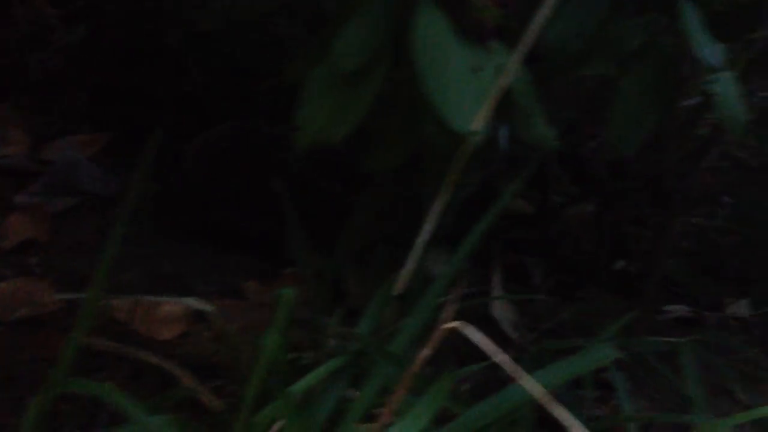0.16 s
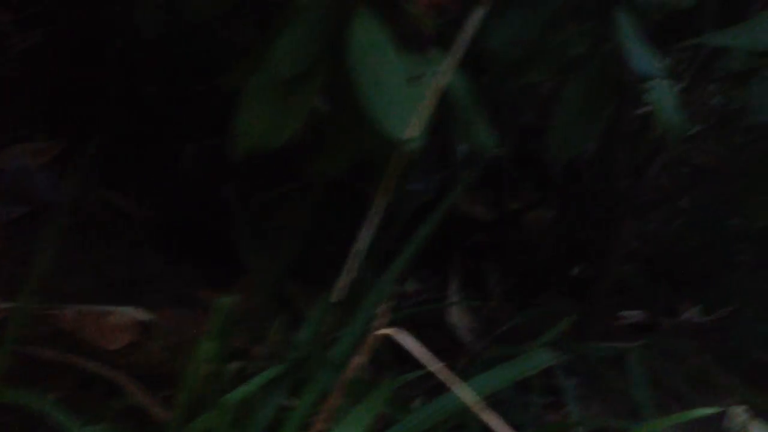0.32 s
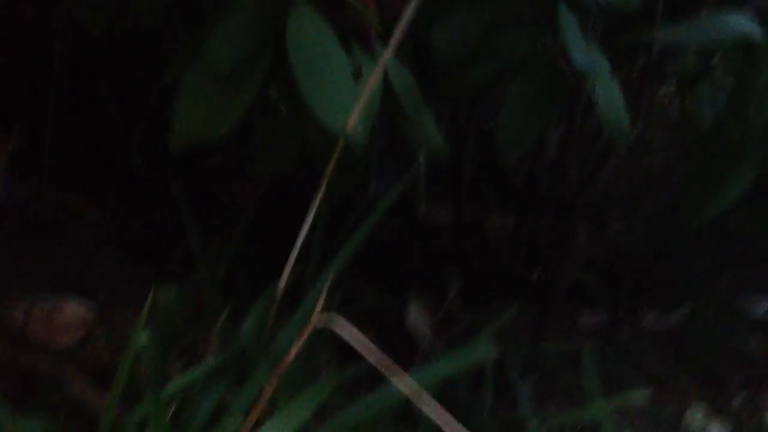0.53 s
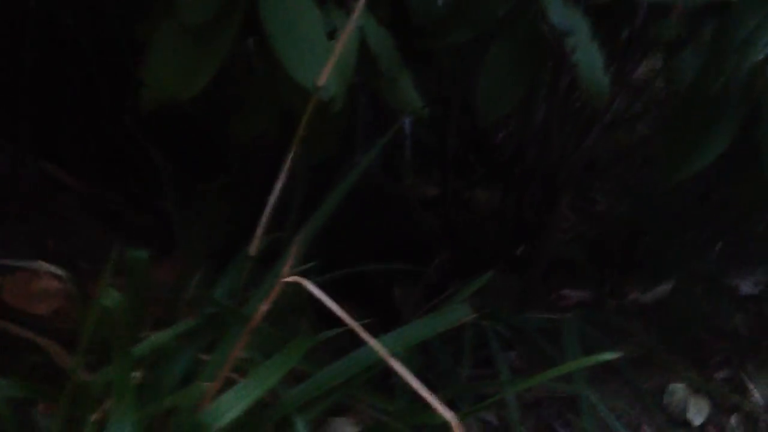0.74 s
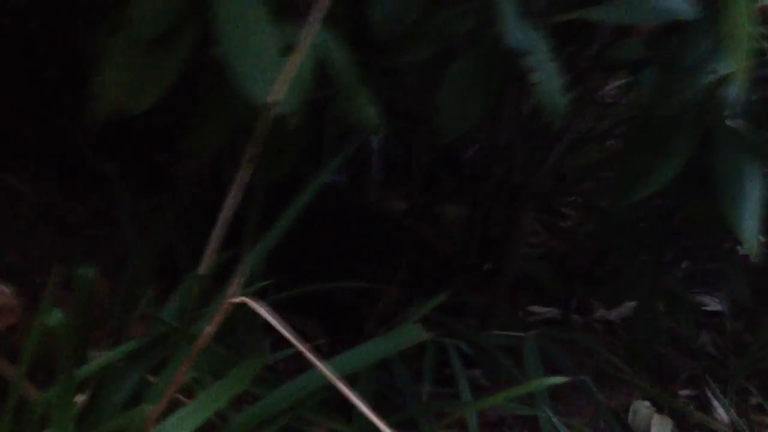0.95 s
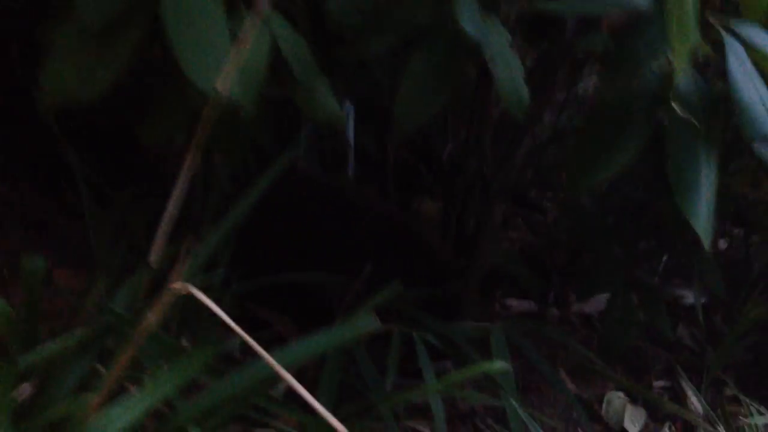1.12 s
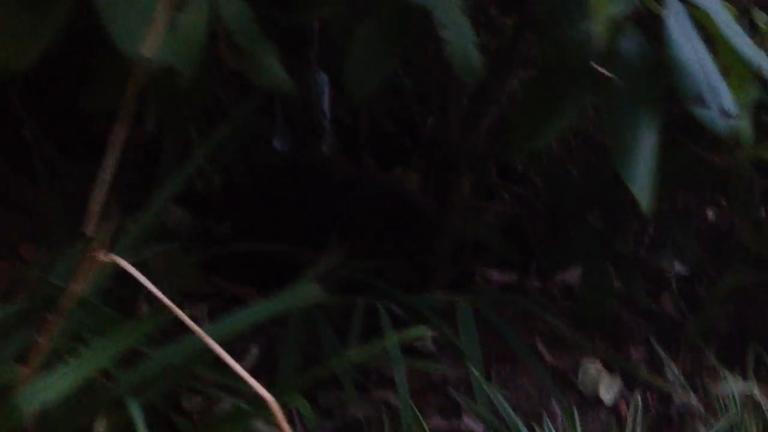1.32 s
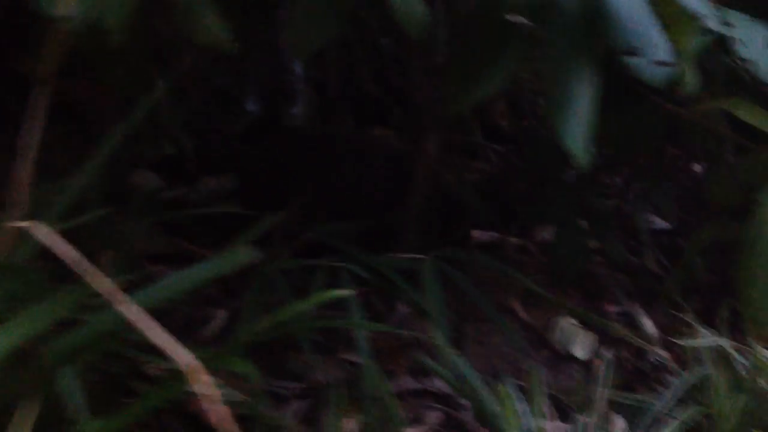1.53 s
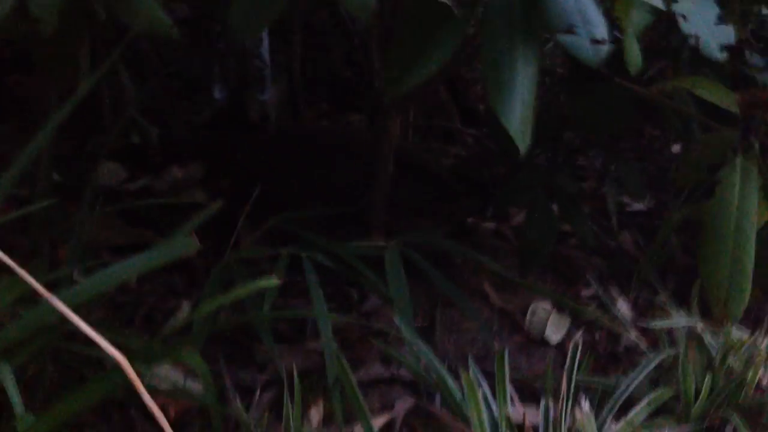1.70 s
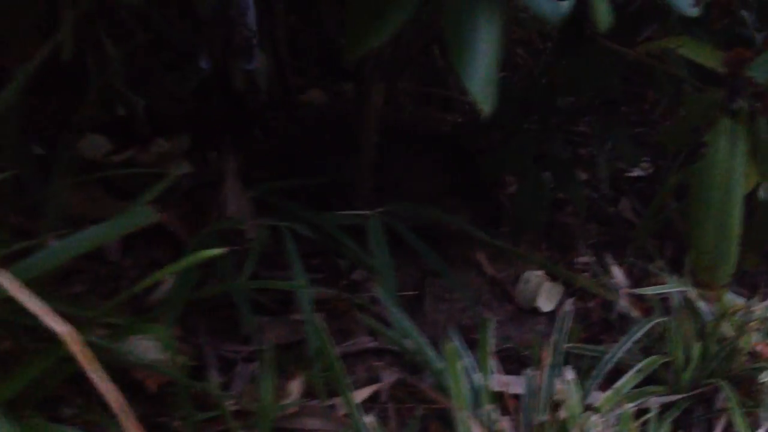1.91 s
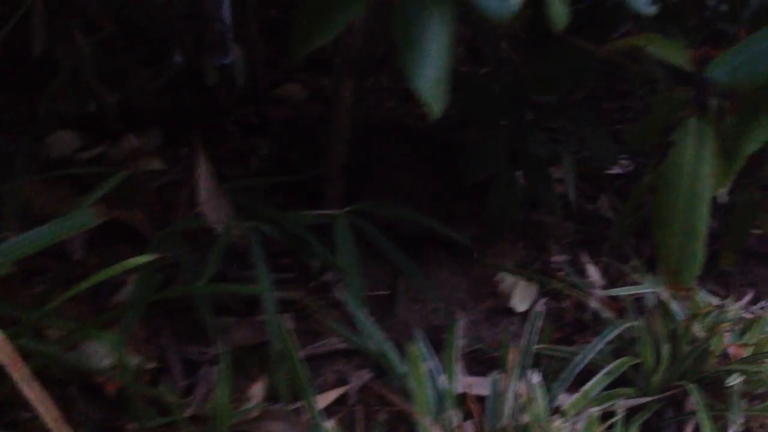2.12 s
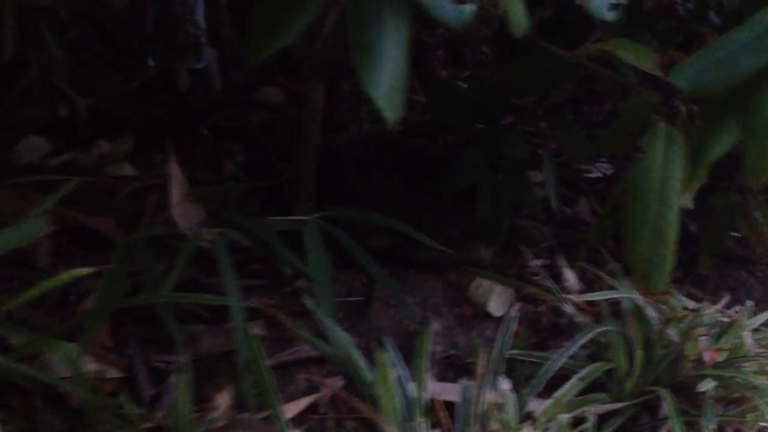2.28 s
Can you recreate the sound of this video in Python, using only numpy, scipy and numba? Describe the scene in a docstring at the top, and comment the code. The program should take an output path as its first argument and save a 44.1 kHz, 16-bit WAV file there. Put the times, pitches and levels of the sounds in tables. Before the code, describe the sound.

Dry leaves rustle and crinkle in swells, with sharp crackling snaps, close up in a garden bed

```python
"""Dry leaves drag and crinkle in swells as a small animal pushes through a garden bed at dusk,
close to a hand-held phone: swarms of short fading sines follow level tracks.
Snaps are showers of such grains behind a crack; scuffs are grains that swell and fade.
The animal squeaks softly (gliding sines); distant hum and hiss (filtered noise) lie under it all."""
import sys
import numpy as np
from scipy import signal
from scipy.fft import rfft, irfft
from scipy.io import wavfile
from numba import njit

SR = 44100
rng = np.random.default_rng(int(sys.argv[2]) if len(sys.argv) > 2 else 0)


def pcm_store(signal):
    """Save signal as 16-bit PCM."""
    levels = np.round(np.clip(np.atleast_2d(signal), -1, 1) * 32767)
    wavfile.write(sys.argv[1], SR, levels.astype(np.int16).T)


def to_linear_factor(level_db):
    """Convert decibel levels (scalar or array-like) to linear amplitude factors."""
    exponent = np.asarray(level_db, float) / 20
    return 10 ** exponent


N = 103635  # samples
DULL_HZ, DULL_OCTAVES = 1580, 0.75  # centre and pitch spread of dull grains


@njit
def ring(start, hz, t60_s, size):
    """Sums grains, each one sine decaying by 60 dB in t60_s."""
    out = np.zeros(N)
    for k in range(len(start)):
        turn = np.exp(2j * np.pi * hz[k] / SR - np.log(1000.) / (t60_s[k] * SR))
        z = size[k] + 0j
        for i in range(max(start[k], 0), min(N, start[k] + int(t60_s[k] * SR) + 2)):
            out[i] += z.imag
            z *= turn
    return out


def grains(at_s, level_db, centre_hz, octaves, cycles, scatter_db, draw):
    """Grains ring for a set number of cycles; pitch scatters, size has a long tail of loud ones."""
    hz = np.clip(centre_hz * 2 ** (octaves * draw[..., 0]), 300, 16500)
    tail_db = np.minimum(scatter_db * (draw[..., 1] ** 2 + draw[..., 2] ** 2 - 2) / 2, 8.0)
    size = to_linear_factor(level_db + tail_db) * np.sign(draw[..., 1])
    start = (at_s * SR).astype(np.int64)
    return ring(start.ravel(), hz.ravel(), (cycles / hz).ravel(), size.ravel())


def colour(x, points):
    """Zero-phase filter through (hz, gain_db) points, straight on a log-frequency axis."""
    f = np.arange(N // 2 + 1) * SR / N + 1
    hz, gain_db = np.array(points).T
    return irfft(rfft(x) * to_linear_factor(np.interp(np.log(f), np.log(hz), gain_db)), N)


def flutter(at_s, rate_hz):
    """Random level: normal draws of unit spread at rate_hz, joined by straight lines."""
    steps = rng.standard_normal(size=400)
    return np.interp(at_s * rate_hz, np.arange(len(steps)), steps)


def rustle(count=9000):
    """Dragged leaves: three grain swarms share a slow and a quick flutter; each adds its own."""
    # time_s, hollow_db (crinkle near 4.5 kHz), crisp_db (treble), dull_db (shuffle); before trims
    drag = np.array([(0.0, -73, -88, -70), (0.23, -63, -50.5, -59.5), (0.37, -57, -56, -59),
                     (0.56, -50.5, -50.5, -58), (0.67, -49.5, -56, -60.5), (0.9, -49, -53, -53.5),
                     (0.955, -55.5, -64, -59), (1.12, -61.5, -55.5, -62.5), (1.34, -51.5, -55, -62),
                     (1.48, -52.5, -54.5, -59), (1.6, -67, -63, -58.5), (1.82, -100, -64, -70.5),
                     (2.05, -55.5, -50, -58), (2.21, -74, -59, -64), (2.35, -85, -83, -66)]).T
    at_s = rng.random((3, count)) * N / SR
    shared_db = flutter(at_s, 44.57) * 1.16 + flutter(at_s, 150) * 3.6
    level_db = []
    for k, share in enumerate((1, 1, .5)):
        track_db = np.interp(at_s[k], drag[0], drag[k + 1])
        level_db.append(track_db + share * shared_db[k] + 2.6 * flutter(at_s[k], 120))
    draw = rng.standard_normal((3, count, 3))
    hollow = grains(at_s[0], level_db[0] - 4.0, 4440, 0.13, 19.7, 1.6, draw[0])
    crisp = grains(at_s[1], level_db[1], 8000, 0.61, 11.6, 1.0, draw[1])
    dull = grains(at_s[2], level_db[2] - 3.0, DULL_HZ, DULL_OCTAVES, 6.1, 1.4, draw[2])
    return np.array([hollow + crisp, dull])


def air():
    """Steady distant hiss and a low hum of slowly changing level, both shaped from white noise."""
    # hiss spectrum: hz, relative_db (per Hz)
    hiss_points = [(40, -39), (101, -5), (151, -6), (454, -6), (528, -12), (1040, -13), (1370, -22.5),
                   (2980, -17), (4500, -15), (8000, -15.5), (10200, -24), (14400, -22)]
    # hum level: time_s, level_db (before a 4 dB cut)
    hum_track = np.array([(0.0, -63.5), (0.69, -61), (0.9, -63.5), (1.61, -60.5), (1.81, -65),
                          (2.35, -54.5)]).T
    hum_hz, hum_octaves, hiss_rms_db = 151.4, 0.57, -61
    hiss = colour(rng.standard_normal(N), hiss_points)
    f = np.arange(N // 2 + 1) * SR / N + 1
    band = np.exp(-(np.log2(f / hum_hz) / hum_octaves) ** 2 / 2)
    hum = irfft(rfft(rng.standard_normal(N)) * band, N)
    swell = to_linear_factor(np.interp(np.arange(N) / SR, *hum_track) - 4.0)
    return hiss / hiss.std() * to_linear_factor(hiss_rms_db) + hum / hum.std() * swell


def bursts(at_s, level_db, leaf_hz, dull_db, tilt_db, draw):
    """Grain bursts: 1/3 near the leaf's pitch, 1/2 spread wide (more if bright), 1/6 dull."""
    kind = np.arange(at_s.shape[1]) % 6
    own, wide, low = kind < 2, (kind > 1) & (kind < 5), kind == 5
    leaf_hz = leaf_hz + 0 * at_s  # one pitch per grain
    pitch = draw[..., 0]
    bright_db = 2.4 * np.log2(leaf_hz / 6000)
    slope_db = tilt_db * np.clip(pitch, -.3, 1.5) + 2.6 * np.minimum(pitch + 0.99, 0)
    wide_db = level_db + 3.0 + bright_db + slope_db
    low_db = level_db + dull_db + 5.5
    leaf = grains(at_s[:, own], level_db[:, own] - 2.5, leaf_hz[:, own], 0.053, 33.3, 0.62, draw[:, own])
    spread = grains(at_s[:, wide], wide_db[:, wide], 7930, 0.58, 9.9, 1.3, draw[:, wide])
    dull = grains(at_s[:, low], low_db[:, low], DULL_HZ, DULL_OCTAVES, 5.44, 1.7, draw[:, low])
    return np.array([leaf + spread, dull])


def snaps(count=120):
    """Sudden snaps: a sharp crack, then a shower of grains that thins and fades."""
    # start_s (before the lag), level_db (nominal), centre_hz, t60_s,
    # dull_db (relative), tilt_db (towards the top treble)
    snap_rows = np.array([(.0034, -45, 6840, 0.069, -4.5, -5.5), (0.1612, -46.5, 6240, 0.049, -8.5, -20),
                          (0.2073, -43.5, 6800, .09, -7, -5), (0.4269, -46, 3700, 0.025, -6, 0),
                          (0.4618, -39, 8500, 0.06, -5.5, -17), (0.699, -42, 4500, 0.023, -13, -10),
                          (0.743, -44, 8950, 0.034, -29, 1), (1.0181, -46, 8340, 0.026, -8, -4),
                          (1.152, -38.5, 8800, 0.0096, -33, 5), (1.1568, -38, 8300, 0.04, -24, -8),
                          (1.2859, -28.5, 7000, 0.028, -41, 6.5), (1.2984, -47, 3980, 0.024, -25, 11),
                          (1.3086, -42, 7260, 0.035, -24, 7), (1.3462, -32.5, 7850, 0.013, -37, 6),
                          (1.353, -27, 8900, 0.016, -37, -2), (1.3574, -29.5, 4600, 0.035, -30, 7.5),
                          (1.6159, -37, 5970, 0.027, -19, -5), (1.638, -43, 6250, 0.011, -20, 0.5),
                          (1.6955, -47.5, 6260, 0.041, -33, -1), (1.7243, -62, 4660, 0.039, 7, -3),
                          (1.7354, -40.5, 6600, 0.024, -12, 1.5), (1.7454, -45, 8150, 0.033, -32, 4.5),
                          (1.86, -35.5, 7800, .04, -17, 2), (1.9988, -52.5, 7190, 0.03, -2.5, -1),
                          (2.0804, -43, 7760, 0.049, -20, 4)])
    lag_s = .0008
    start_s, level_db, hz, t60_s, dull_db, tilt_db = snap_rows.T[:, :, None]
    draw = rng.standard_normal((len(start_s), count, 3))
    late = np.linspace(0, 1, count) ** 1.6 * 0.58  # in t60s
    late_s = late * np.abs(t60_s)
    crack_db = 3 * np.exp(-late_s / .0005)
    dense_db = 10 * np.log10(np.abs(t60_s) / 0.04)  # evens out grain density
    grain_db = level_db + dense_db - 60 * late + crack_db
    return bursts(start_s + lag_s + late_s, grain_db, hz, dull_db, tilt_db, draw)


def scuffs(count=360):
    """Grains under a tent-shaped dB level that stutters; the leaf's pitch wanders as it bends."""
    # top_s, level_db (nominal), centre_hz, rise_s, fall_s, dull_db (relative)
    scuff_rows = np.array([(0.315, -48.5, 3880, 0.004, 0.069, -14), (0.391, -48.5, 3870, 0.002, 0.03, -33),
                           (0.479, -41.5, 4230, 0.0078, 0.094, -11), (0.54, -43, 6500, 0.031, 0.011, -17),
                           (0.589, -45.5, 4130, 0.023, 0.032, -28), (.73, -41, 4950, 0.053, 0.06, -15),
                           (0.779, -39, 4400, 0.061, 0.045, -12.5), (0.879, -52, 4500, 0.031, 0.091, -28),
                           (0.971, -44.5, 5160, 0.0019, 0.092, -18),
                           (1.164, -45.5, 6800, 0.006, 0.045, -13),
                           (1.192, -40.5, 4800, 0.0092, 0.049, -14.5),
                           (1.228, -39, 4820, 0.015, 0.043, -16.5), (1.33, -41, 5160, 0.012, 0.029, -20),
                           (1.565, -36.5, 7200, 0.014, 0.022, -24), (1.601, -41.5, 5800, 0.035, 0.039, -24),
                           (1.657, -35, 6700, 0.04, 0.03, -17.5), (1.827, -46.5, 7200, 0.012, 0.049, -13.5),
                           (1.86, -37.5, 5960, 0.021, 0.051, -9.5), (2.001, -49, 6050, 0.0028, 0.1, -34),
                           (2.057, -40, 6950, 0.017, 0.0096, -26), (2.088, -48.5, 6340, 0.0098, 0.098, -15)])
    top_s, level_db, hz, rise_s, fall_s, dull_db = scuff_rows.T[:, :, None]
    draw = rng.standard_normal((len(top_s), count, 3))
    from_top_s = -rise_s + (rise_s + fall_s) * np.linspace(0, 1, count)
    at_s = top_s + from_top_s
    sparse_db = 10 * np.log10((rise_s + fall_s) / 0.049)  # evens out grain density
    stutter_db = 1.64 * flutter(at_s, 160)
    bend = 2 ** (0.081 * flutter(at_s, 90))
    tent_db = -18 * np.maximum(-from_top_s / rise_s, from_top_s / fall_s)
    return bursts(at_s, level_db + sparse_db + stutter_db + tent_db, hz * bend, dull_db, 0, draw)


def squeaks():
    """A near sine that climbs, holds, drops fast and is loudest late."""
    # start_s, length_s, top_hz, level_db (before flutter), arch (pitch depth, 0-1)
    squeak_rows = [(.947, .053, 1545, -58, .28), (1.472, .055, 1490, -55, .3),
                   (1.79, .009, 1800, -59.5, .05), (1.881, .018, 1610, -54, .05)]
    swell_db_per_s = 220
    top_at, drop_at, drop_share = .4, .76, .7  # fractions of length; share of arch
    out = np.zeros(N)
    for start_s, length_s, top_hz, level_db, arch in squeak_rows:
        u = np.arange(int(length_s * SR)) / (length_s * SR)
        climb = np.maximum(1 - u / top_at, 0) ** 1.5
        drop = drop_share * np.maximum(u - drop_at, 0) / (1 - drop_at)
        hz = top_hz * (1 - arch * (climb + drop))
        swell_db = -swell_db_per_s * length_s * np.maximum(.75 - u, 0)
        now_db = level_db + swell_db + 2.0 * flutter(start_s + u * length_s, 130)
        tone = np.sin(2 * np.pi * np.cumsum(hz) / SR)
        i = int(start_s * SR)
        out[i:i + len(u)] += to_linear_factor(now_db) * np.sin(np.pi * u) ** 0.3 * tone
    return out


def scene():
    """Leaves as coloured by the ground and the phone, squeaks and air."""
    # colour of crisp grains: hz, gain_db
    crisp_points = [(2600, -18), (3400, -1.5), (3900, -0.3), (4500, -0.5), (5400, -4), (7500, 1),
                    (10600, -5), (13000, 0.5), (15000, -1)]
    # colour of dull grains: hz, gain_db
    dull_points = [(150, -23), (600, -5), (1800, 1.5), (2800, 5), (4400, -8)]
    crisp, dull = rustle() + snaps() + scuffs()
    leaves = colour(crisp, crisp_points) + colour(dull, dull_points)
    return (leaves + squeaks() + air())[None]


def top_cut(x):
    """Nothing passes above the cut-off."""
    return signal.sosfilt(signal.butter(12, 16090, fs=SR, output="sos"), x)


def record(dry):
    """The phone cuts the top above 15250 Hz and the bass below 70 Hz."""
    low_pass = signal.ellip(6, .5, 28, 15250, fs=SR, output="sos")
    high_pass = signal.butter(2, 70, "high", fs=SR, output="sos")
    mix = signal.sosfilt(high_pass, signal.sosfilt(low_pass, dry))
    return top_cut(mix)


dry = scene()
out = record(dry)
pcm_store(out)
```